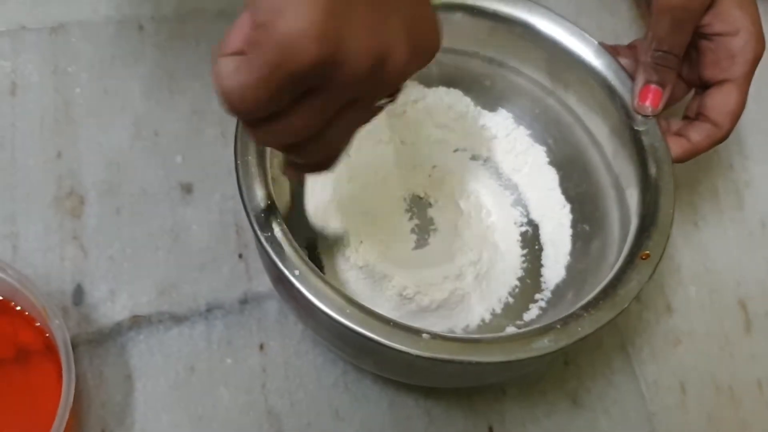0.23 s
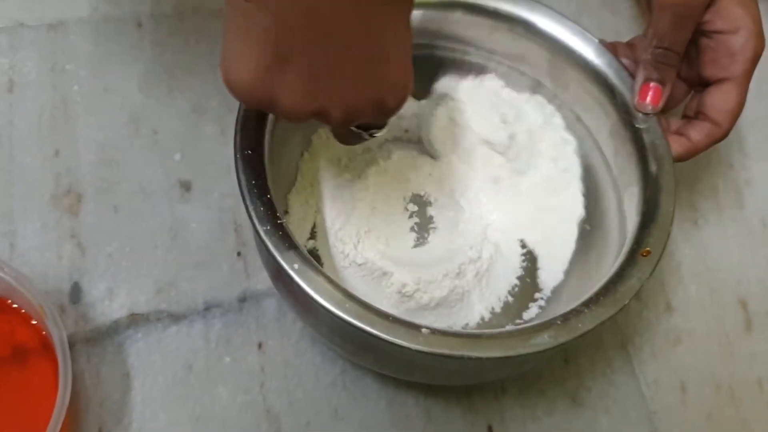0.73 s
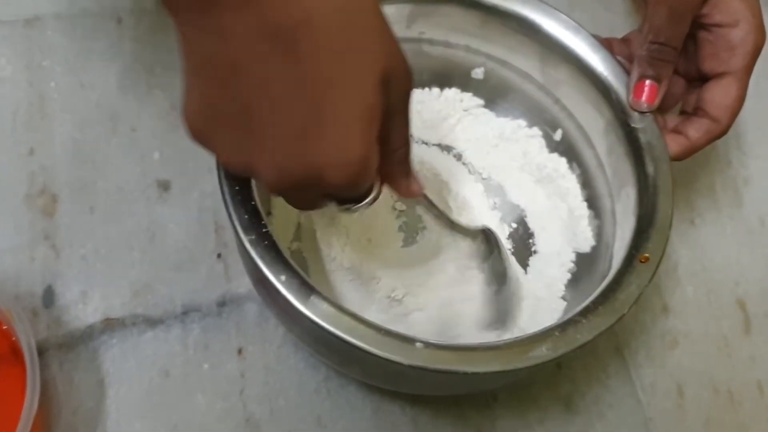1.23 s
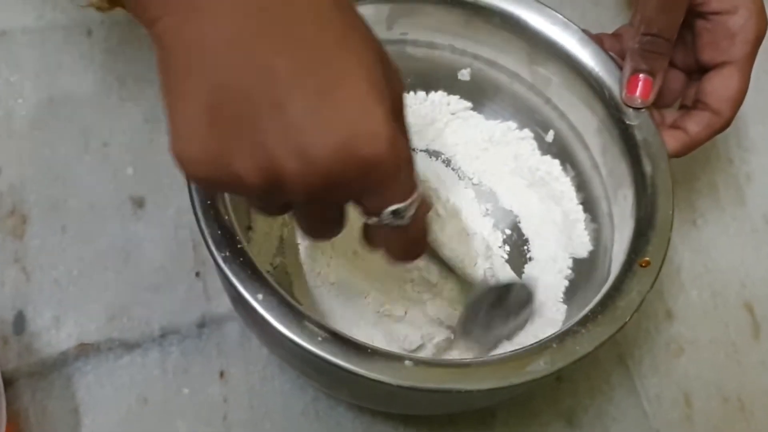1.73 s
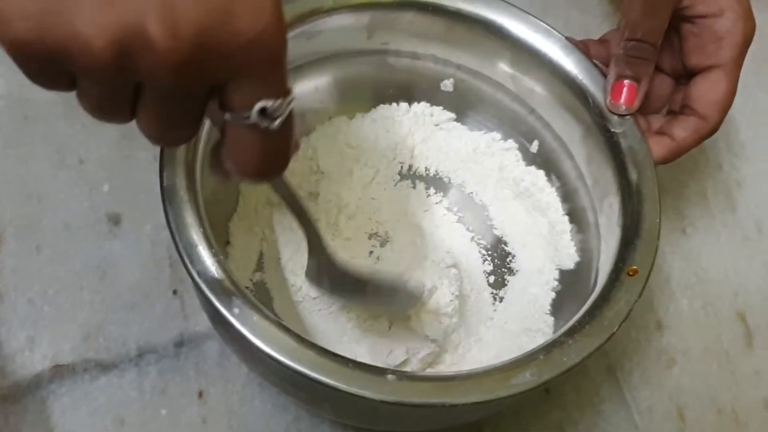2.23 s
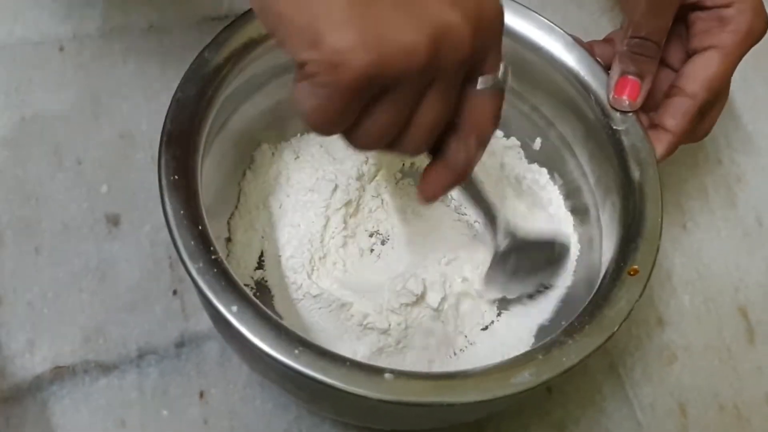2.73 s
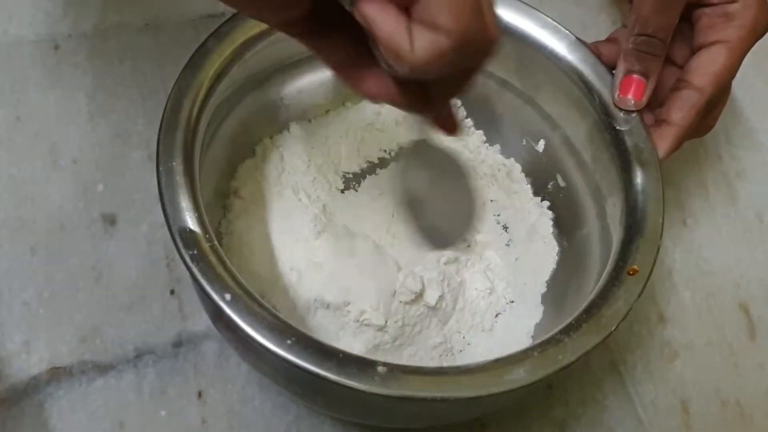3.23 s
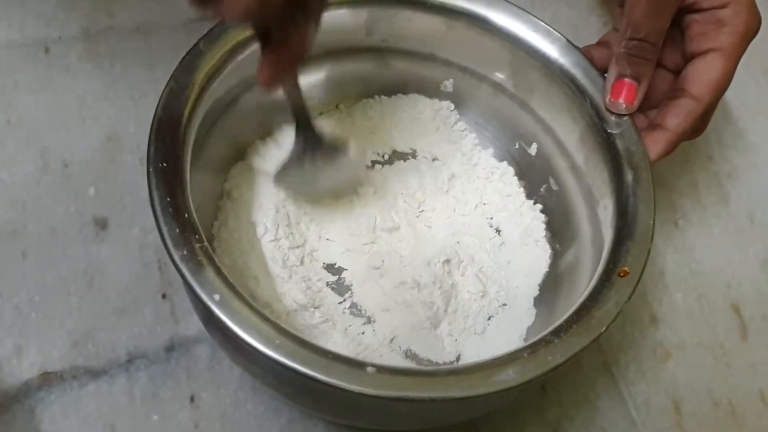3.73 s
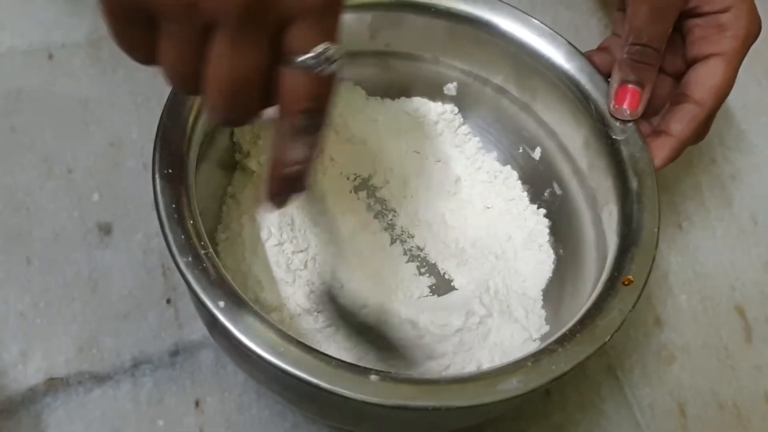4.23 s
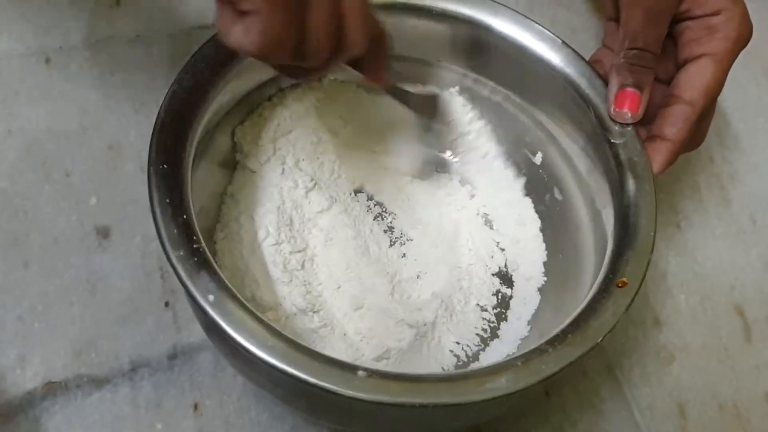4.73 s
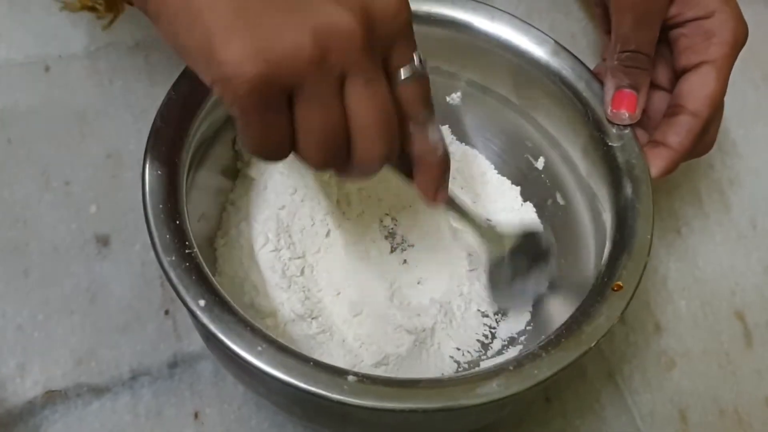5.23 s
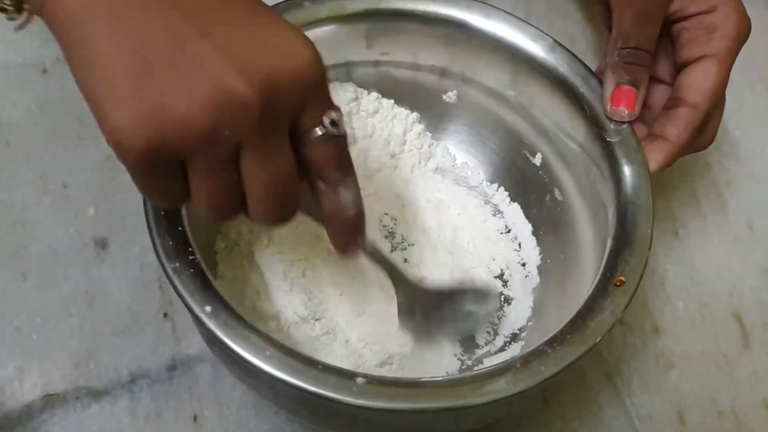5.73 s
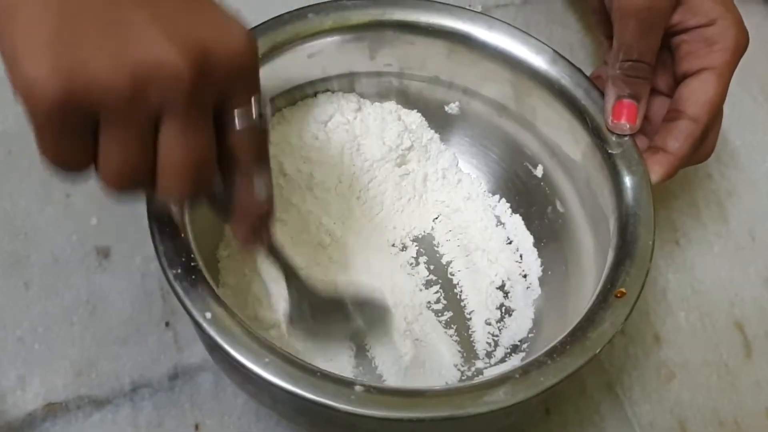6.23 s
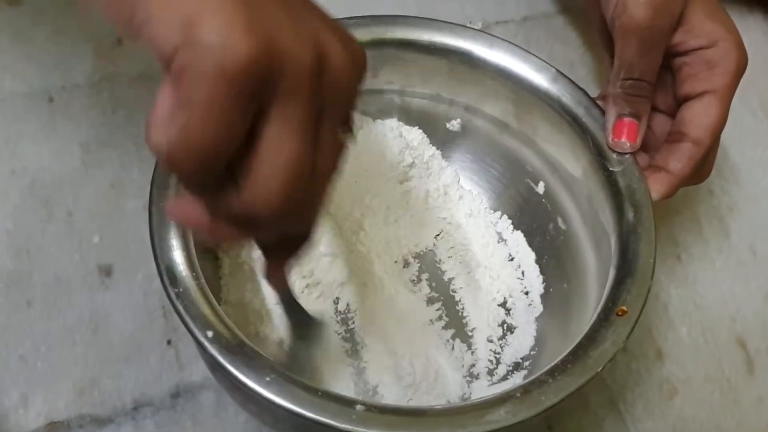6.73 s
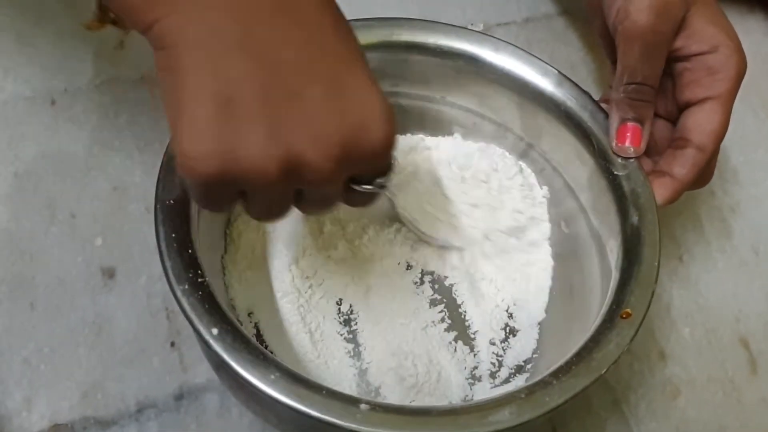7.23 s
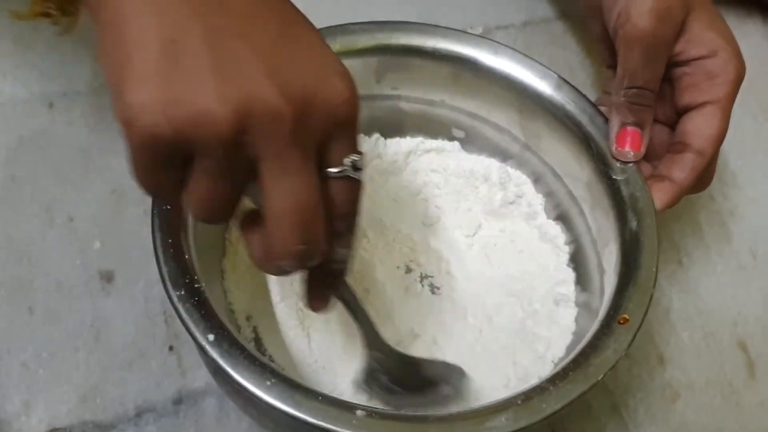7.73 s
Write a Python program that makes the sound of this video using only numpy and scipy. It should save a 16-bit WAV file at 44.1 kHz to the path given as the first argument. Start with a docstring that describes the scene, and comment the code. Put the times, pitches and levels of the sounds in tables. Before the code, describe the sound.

Close stereo pickup of a spoon dragging through powder against a thin metal bowl. Scrapes start at once, thin out with gaps, then grow busier and harder, with several solid clacks and crunchy scratches before a last longer scrape. The bowl shifts faintly on stone. Short hard-room echoes surround it, over constant airy hiss, soft rumble and hum; the right side is duller on top.

```python
"""In a small hard room, a steel spoon stirs dry flour in a hand-held steel bowl on a stone top.
Each stroke grinds powder along the wall: showers of tiny clicks set off the resonances of the bowl.
The spoon lands with damped knocks, catches on grit in bursts of noise, and now and then rings the steel.
The bowl shifts on the stone with short dull rumbles. Behind it all runs a high, hollow hiss of filtered
noise, perhaps a gas burner, over a low rumble and a mains hum."""
import sys
import numpy as np
from scipy import signal
from scipy.fft import rfft, irfft
from scipy.io import wavfile

SR = 44100
rng = np.random.default_rng(int(sys.argv[2]) if len(sys.argv) > 2 else 0)


def to_wav(sig):
    """Store sig (one row per channel, or 1-D mono) as 16-bit WAV at the path in sys.argv[1].

    Samples outside -1..1 are clipped; the rate is SR.
    """
    pcm = np.clip(np.atleast_2d(sig), -1, 1) * 32767
    pcm = np.round(pcm).astype(np.int16)
    wavfile.write(sys.argv[1], SR, pcm.T)  # frames by channels


N = 352359

# middle resonances under the sliding spoon: (pitch_hz, width_hz, relative level_db)
MIDDLE_RESONANCES = [(2235, 300, -4), (2540, 820, -2.5), (3020, 170, -13), (3500, 780, 0.5),
                     (4150, 240, 2.5), (4400, 254, -1)]
# high resonances under the sliding spoon: (pitch_hz, width_hz, relative level_db)
HIGH_RESONANCES = [(5460, 670, -11.5), (7056, 464, 3), (8100, 1170, -3), (9260, 660, -2), (10750, 990, 3),
                   (12370, 1840, 0.5), (14800, 800, 0.5), (15600, 260, -5)]
# tones of the steel ringing freely: (pitch_hz, relative level_db, time to fall by 60 dB t60_s)
FREE_RING = [(633, -1.5, 0.36), (1120, -5.5, 0.43), (1500, -2, 0.18), (3147, -10, 0.7), (3530, -3.5, 0.23),
             (3880, -4, 0.22), (4354, 1.5, 0.31), (4450, -13, 0.11), (5600, -8.5, 0.25), (5970, -13, 0.11),
             (6260, -6.5, 0.14), (6780, -4, 0.25), (7850, 0.5, 0.1), (9345, -25, .3), (10860, 0, 0.29),
             (12470, -22, .21), (12690, -15, .25), (14630, -18.5, .25)]


def from_db(db):
    """Turn decibels into a gain."""
    return 10 ** (np.asarray(db) / 20)


def rms_one(x):
    """Scale a sound to an average (rms) strength of 1."""
    return x / np.sqrt(np.mean(x ** 2) + 1e-20)


def seconds(size):
    """Time in seconds for each of so many samples."""
    return np.arange(size) / SR


def dying(t, t60):
    """Gain that falls by 60 dB in t60 seconds."""
    return np.exp(-np.log(1000) * t / t60)


def add(out, s, sound):
    """Mix a sound in, starting at time s."""
    at = max(round(s * SR), 0)
    out[..., at:at + sound.shape[-1]] += sound[..., :N - at]


def drift(rate):
    """Slow random wander with spread 1, moving to a new chance value `rate` times a second."""
    knots = rng.standard_normal(N // 16)
    return rms_one(np.interp(seconds(N) * rate, np.arange(len(knots)), knots))


def stereo(pair, alike):
    """Blend two unrelated signals into a left and a right that are alike to a given degree."""
    alike = np.clip(alike, -1, 1)
    shared = np.sqrt((1 + alike) / 2) * pair[0]
    opposed = np.sqrt((1 - alike) / 2) * pair[1] * [[1], [-1]]
    return shared + opposed


def colour(x, spectrum, size=8192):
    """Filter that follows a (pitch_hz, level_db) table and responds as early as it can (minimum phase)."""
    hz, db = np.transpose(spectrum)
    gain = from_db(np.interp(np.log(np.fft.rfftfreq(size, 1 / SR) + 1), np.log(hz), db))
    # folding the cepstrum (the spectrum of the log gain) puts the whole response after time 0
    cepstrum = irfft(np.log(gain))
    cepstrum[1:size // 2] *= 2
    cepstrum[size // 2 + 1:] = 0
    response = irfft(np.exp(rfft(cepstrum)))
    return signal.oaconvolve(x, response[None], axes=1)[:, :N]


def resonate(x, resonances):
    """Resonances side by side, of alternating sign; a wider one dies away sooner."""
    out = 0
    for k, (hz, width, db) in enumerate(resonances):
        r = np.exp(-np.pi * width / SR)
        poles = [1, -2 * r * np.cos(2 * np.pi * hz / SR), r * r]
        ringing = signal.lfilter([1, 0, -1], poles, x + 1e-18)
        out = out + (-1) ** k * from_db(db) * (1 - r * r) / 2 * ringing
    return out


def band(x, low_hz, high_hz):
    """Keep what lies between two pitches, with gentle edges."""
    edges_hz = [low_hz, min(high_hz, .45 * SR)]
    return signal.sosfilt(signal.butter(2, edges_hz, "band", fs=SR, output="sos"), x)


def sweep(t, length, crest, swell_db):
    """Drag, rasp and hiss gains of one sweep: the push grows to a crest and eases off, then the spoon lifts."""
    touch_s, lift_t60_s = .012, .12   # the spoon sets down, and leaves the wall
    # over a sweep the spoon's weight comes off the wall, and the powder hiss thins a little
    settle_db, thin_db = 4, -1.5
    drag_follows, rasp_follows = 0.58, 0.97   # share of the swell that drag and rasp take part in
    along, crest = np.clip(t / length, 0, 1), np.clip(crest, .02, .98)
    push_db = -swell_db * np.maximum(1 - along / crest, (along - crest) / (1 - crest))
    touching = np.clip(t / touch_s, 0, 1) * dying(np.maximum(t - length, 0), lift_t60_s)
    drag_db = drag_follows * push_db - settle_db * (along - crest)
    rasp_db = rasp_follows * push_db
    hiss_db = push_db + thin_db * (along - crest)
    return touching * from_db([drag_db, rasp_db, hiss_db])


def stroke_gains():
    """Drag, rasp and hiss gains of all sweeps, with bell-shaped bites on top."""
    # sweeps of the spoon through the flour: (start_s, length_s, place of the hardest push 0-1,
    # swell up to that push_db, then before trims: drag on the wall_db, squeaky rasp_db, powder hiss_db)
    strokes = [(0.0, 0.22, 0.03, 19.5, -46.5, -50, -42), (0.208, 0.45, 0.03, 10, -51, -51.5, -47.5),
               (0.698, 0.24, 0.84, 4, -61, -62, -60), (0.956, 0.13, 0.16, 9.5, -56, -55, -49),
               (1.685, 0.32, 0.53, 9.5, -54.5, -50, -49), (2.457, 0.22, 0.7, 3.5, -57, -49.5, -46),
               (2.718, 0.39, 0.1, 3, -57, -55.5, -48), (3.494, 0.19, 0.7, 8, -51, -47, -43),
               (3.914, 0.059, 0.73, 8.5, -45.5, -46, -39), (4.006, 0.1, 0.3, 7, -47, -44.5, -41.5),
               (4.319, .09, .6, 3, -58, -57, -71), (4.416, 0.36, 0.29, 18, -52, -46.5, -37.5),
               (5.152, 0.32, 0.46, 11.5, -52.5, -54.5, -44), (5.735, 0.22, 0.29, 18, -41, -43, -41),
               (6.17, 0.15, 0.85, 11, -53, -44.5, -41.5), (6.633, .34, 0, 8, -46, -48, -41.5),
               (6.999, .16, 0.58, 7.5, -51, -44.5, -43.5), (7.215, .16, 0.13, 4.5, -57, -53, -51),
               (7.47, 0.071, 0.3, 4, -59, -72, -60.5), (7.68, 0.4, 0.65, 8.5, -52, -52, -47)]
    # the edge bites through the flour to the steel, in a short bright scratch:
    # (middle_s, length at half height_s, then before trims: rasp_db, hiss_db)
    bites = [(0.229, 0.029, -42, -37.5), (0.271, 0.022, -53, -38.5), (0.398, 0.027, -41.5, -52),
             (1.797, 0.048, -56, -43), (2.925, 0.043, -54, -42.5), (3.092, 0.035, -53, -44.5),
             (4.064, 0.041, -52, -33.5), (4.452, 0.047, -46, -46), (4.568, 0.047, -66, -48),
             (5.349, 0.045, -37, -41), (5.84, 0.058, -53, -28.5), (6.658, 0.015, -54, -33.5),
             (6.691, 0.027, -51, -39.5), (6.9, 0.08, -70, -47), (7.006, 0.031, -58, -40),
             (7.806, 0.055, -58, -37.5)]
    bite_drag_db = -4.5   # drag of a bite against its rasp
    t, gains = seconds(SR), np.zeros((3, N))
    for s, length, crest, swell_db, *levels_db in strokes:
        add(gains, s, from_db(levels_db)[:, None] * sweep(t, length, crest, swell_db))
    for s, length, rasp_db, hiss_db in bites:
        bell = np.hanning(max(round(2 * length * SR), 1))
        levels_db = [rasp_db + bite_drag_db, rasp_db, hiss_db]
        add(gains, s - length, from_db(levels_db)[:, None] * bell)
    return gains


def grains(per_s, spread_db):
    """Two streams of tiny clicks of uneven size: powder crushed under the spoon."""
    sizes = from_db(spread_db * np.minimum(rng.exponential(1, (2, N)), 4))
    signed = sizes * rng.choice([-1, 1], (2, N))
    return signed * (rng.random(N) < per_s / SR)


def travelling(x, moves_per_s, path_t60=0.0074, ring_db=-2.5, ring_t60=0.049, focus_db=12, count=10, order=70):
    """The spoon slides between spots, each with its own nulls and mix of the bowl's many high modes."""
    t, out, power = seconds(4096), 0, 0
    mode_hz = np.linspace(2000, 16000, order) + rng.normal(0, 50, order)
    modes = np.exp(2j * np.pi * mode_hz[:, None] * t) * dying(t, ring_t60)
    for spot in range(count):
        paths = rms_one(stereo(rng.standard_normal((2, len(t))), alike=0.37) * dying(t, path_t60))
        strengths = rng.exponential(1, order) * np.exp(2j * np.pi * rng.random((2, order)))
        ring = rms_one((strengths @ modes).real)
        near = from_db(focus_db * drift(moves_per_s))
        heard = signal.oaconvolve(x, paths + from_db(ring_db) * ring, axes=1)[:, :N]
        out = out + near * heard / heard.std(axis=1, keepdims=True)
        power = power + near ** 2
    return out / np.sqrt(power)   # the total stays level as the spots trade places


def singing(force):
    """Rubbing keeps the free modes of the steel faintly alive."""
    # a longer ring means a narrower resonance
    resonances = [(hz, np.log(1000) / (np.pi * t60), db) for hz, db, t60 in FREE_RING]
    return resonate(force, resonances)


def scraping(drag_db=-1, rasp_db=-1, mid_db=0, hiss_db=3, sing_db=7, grit_db=-7,
             judder_db=3.0, judder_per_s=70, lumpy_db=2, rasp_share=0.5):
    """Grains excite the bowl while the spoon sticks and slips; the middle follows both rasp and hiss."""
    # low resonances under the sliding spoon: (pitch_hz, width_hz, relative level_db)
    low_resonances = [(370, 69, -22), (600, 23, -3), (783, 180, 10), (970, 260, -8)]
    # squeaky resonances of the rasp: (pitch_hz, width_hz, relative level_db)
    rasp_resonances = [(1550, 163, 5), (1800, 240, -22)]
    drag, rasp, hiss = stroke_gains()
    between = (rasp + 1e-9) ** rasp_share * (hiss + 1e-9) ** (1 - rasp_share)
    judder = rms_one(from_db(judder_db * drift(judder_per_s)))

    powder = travelling(stereo(grains(per_s=5000, spread_db=3), alike=0.94), moves_per_s=13)
    grit = rms_one(stereo(grains(per_s=500, spread_db=3.5), alike=0.14))
    lumps = stereo(grains(per_s=1300, spread_db=2.0), alike=0.66) * from_db(lumpy_db * drift(30))
    squeak_grains = stereo(grains(per_s=2500, spread_db=2.0), alike=0.18)

    low = band(resonate(lumps, low_resonances), 310, 1110)
    squeak = band(resonate(squeak_grains, rasp_resonances), 1310, 2080)
    mid = band(resonate(powder, MIDDLE_RESONANCES), 1620, 5600)
    high = band(resonate(powder + from_db(grit_db) * grit, HIGH_RESONANCES), 4400, 17700)

    # pressure drives the bowl's low resonances, loose powder its high ones
    rub = from_db(drag_db) * drag * rms_one(low)
    rub += from_db(rasp_db) * rasp * rms_one(squeak)
    rub += from_db(mid_db) * between * rms_one(mid)
    rub += from_db(hiss_db) * hiss * rms_one(high)
    return judder * rub + from_db(sing_db) * singing(between * powder)


def clinks(shimmer=0.95, beat_hz=14, rise_s=0.0012):
    """The struck steel rings freely; each mode has a slightly weaker close twin that makes it beat."""
    # spoon strikes bare steel: (start_s, relative level_db, strongest ring_hz, fall-off_db per octave)
    strikes = [(0.0, -45, 1500, -1), (0.214, -34.5, 7000, 4.5), (2.448, -32.5, 4100, 7.5),
               (3.863, -47, 633, 18), (6.157, -47, 7100, 16), (6.672, -36, 3020, 29)]
    out, t = np.zeros((2, N)), seconds(SR)
    for s, db, centre_hz, fall_db in strikes:
        for hz, mode_db, t60 in FREE_RING:
            phase = rng.uniform(0, 2 * np.pi) + rng.normal(0, 0.68, (2, 1))
            twin_hz = hz + rng.normal(0, beat_hz)
            tone = np.sin(2 * np.pi * hz * t + phase) + shimmer * np.sin(2 * np.pi * twin_hz * t)
            gain = from_db(db + mode_db - fall_db * abs(np.log2(hz / centre_hz)))
            add(out, s, gain * tone * dying(t, t60) * (1 - np.exp(-t / rise_s)))
    return out


def background():
    """Noise shaped into a hollow hiss with three resonances, a low rumble, and a sine for mains hum."""
    # slow course of the background: (time_s, then before trims: rumble_db, hiss_db)
    course = [(0.0, -69, -53), (0.78, -68, -53.5), (2.58, -68, -51), (2.91, -64, -51), (5.41, -68, -52.5),
              (5.9, -63.5, -51.5), (7.99, -69, -51.5)]
    # shape of the steady hiss: (pitch_hz, relative level per hertz_db)
    hiss_shape = [(1100, -30.5), (1300, -20.5), (1520, 2), (1800, -8.5), (2200, -13.5), (2640, 0.5),
                  (3050, -11), (3650, -0.5), (4150, -8), (4700, -24), (5400, -29), (7500, -23.5),
                  (10000, -36), (16000, -35.5)]
    # shape of the low rumble: (pitch_hz, relative level per hertz_db)
    rumble_shape = [(20, -39), (35, -15), (50, -3), (70, -7), (100, -6.5), (160, -13.5), (250, -30),
                    (450, -23), (800, -33), (1300, -49), (3000, -69)]
    rumble_trim_db, hiss_trim_db = 6.5, 4.5
    hum_db, hum_hz = -61.5, 50.3
    dip_s, dip_spread_s, dip_db = 7.5, 0.27, -11.5   # the spread is to each side of the middle
    s, *levels = np.transpose(course)
    rumble_db, hiss_db = [np.interp(seconds(N), s, db) for db in levels]
    hiss = rms_one(colour(stereo(rng.standard_normal((2, N)), alike=0.015), hiss_shape))
    # the lowest resonance of the hiss sinks for a moment
    dip = np.exp(-((seconds(N) - dip_s) / dip_spread_s) ** 2)
    hiss = hiss + (from_db(dip_db * dip) - 1) * resonate(hiss, [(1480, 430, 0)])
    rumble = rms_one(colour(stereo(rng.standard_normal((2, N)), alike=0.71), rumble_shape))
    hum = np.sqrt(2) * np.sin(2 * np.pi * hum_hz * seconds(N))
    noise = from_db(hiss_db + hiss_trim_db) * hiss + from_db(rumble_db + rumble_trim_db) * rumble
    return noise + from_db(hum_db) * hum


def knocks(rattle_db=-22, rattle_t60=0.034, click_t60=0.045, phase_spread=0.66,
           favour_db=7, favour_octaves=0.31, travel_s=0.001):
    """The spoon hits the wall and chatters briefly; a cushioned contact loses its treble."""
    # spoon lands on the flour-cushioned wall: (start_s, relative level_db, contact sharpness_hz,
    # modes favoured by the spot_hz, click against that level_db)
    landings = [(0.081, -36, 1490, 914, -1), (0.213, -37, 3500, 1475, -1), (0.805, -49, 8000, 7100, 12.5),
                (1.690, -46, 893, 836, -20), (1.777, -38, 1100, 950, -8), (2.448, -31, 4000, 1620, 2.5),
                (3.057, -40.5, 900, 850, -20), (3.485, -20.5, 6000, 4450, -11),
                (3.4902, -25.5, 2970, 1900, -18), (3.862, -25.5, 1190, 480, -13.5),
                (4.043, -32, 900, 850, -20), (4.508, -35, 1500, 900, -12), (5.016, -43.5, 7000, 7000, -16),
                (5.136, -25.5, 2220, 875, -14.5), (5.185, -42, 1200, 850, -16),
                (5.724, -12, 2780, 1770, -17), (5.741, -36, 3000, 1800, -18), (5.791, -21, 600, 710, -20.5),
                (6.251, -25, 2200, 1300, -5), (6.6183, -12, 1700, 1000, -15.5),
                (7.097, -37.5, 900, 850, -20), (7.518, -45, 900, 820, -20)]
    # bowl wall, damped by flour and hand: (pitch_hz, relative level_db, time to fall by 60 dB t60_s)
    wall_modes = [(333, -27, 0.061), (480, -28, 0.014), (757, -2.5, 0.021), (950, -3.5, 0.016),
                  (1262, -8, 0.019), (1571, -1, 0.019), (1900, -6, 0.01), (2350, -6.5, 0.018),
                  (2710, -9, 0.011), (3270, 2.5, 0.006), (4440, -3, 0.01), (7020, -9, 0.018)]
    out, t = np.zeros((2, N)), seconds(4096)
    for s, db, sharp_hz, spot_hz, click_db in landings:
        wall = 0
        for k, (hz, mode_db, t60) in enumerate(wall_modes):
            favour = favour_db * np.exp(-(np.log2(hz / spot_hz) / favour_octaves) ** 2)
            # higher modes reach the two microphones ever more out of step
            phase = rng.normal(0, phase_spread, (2, 1)) * hz / 2000
            tone = np.sin(2 * np.pi * hz * t + phase) * dying(t, t60)
            wall = wall + (-1) ** k * from_db(mode_db + favour) * tone
        wall = wall * np.minimum(t / travel_s, 1) ** .5   # the blow takes a moment to spread round the wall
        chatter = band(rng.standard_normal(len(t)), 1920, 12000) * dying(t, rattle_t60)
        force = (t == 0) + from_db(rattle_db) * chatter   # one sharp blow, then the chatter
        struck = signal.fftconvolve(wall, force[None])[:, :len(t)]
        soft = signal.butter(1, min(sharp_hz, .4 * SR), fs=SR)
        thump = signal.lfilter(*soft, struck)
        click = band(rng.standard_normal((2, len(t))), 720, 10200) * dying(t, click_t60)
        add(out, s, from_db(db) * (band(thump, 420, 12000) + from_db(click_db) * click))
    return out


def catches(level_db=-3, body_db=-3):
    """A catch lets go in a short burst of slips: fading noise through the bowl's resonances."""
    # the spoon's edge catches on grit: (start_s, level before trim_db)
    snags = [(0.2175, -12), (0.278, -27), (0.8051, -45), (1.7765, -25), (1.791, -24), (1.81, -21),
             (2.7678, -28), (2.9093, -32), (4.0142, -17.5), (4.051, -17), (4.4616, -26.5), (4.4949, -18),
             (4.5065, -20), (4.5558, -28), (5.018, -32), (6.061, -35), (6.1571, -19), (6.8476, -28),
             (7.005, -31), (7.2232, -27.5)]
    catch_t60_s = 0.024
    slips, t = np.zeros((2, N)), seconds(4096)
    for s, db in snags:
        burst = rng.standard_normal((2, len(t))) * dying(t, catch_t60_s)
        add(slips, s, from_db(db + level_db) * burst)
    return resonate(slips, HIGH_RESONANCES) + from_db(body_db) * resonate(slips, MIDDLE_RESONANCES)


def thuds():
    """Short dull rumbles of low noise that swell and fade as the bowl shifts."""
    # the bowl shifts on the stone: (middle_s, level_db, length_s, rough centre pitch_hz)
    shifts = [(1.435, -47.5, 0.025, 125), (3.868, -49, 0.013, 560), (4.35, -49, .035, 200),
              (4.45, -57, 0.07, 190)]
    out, t = np.zeros((2, N)), seconds(N)
    for s, db, length, hz in shifts:
        rumble = rms_one(band(rng.standard_normal(N), hz / 1.9, hz * 1.38))
        out += from_db(db) * rumble / np.cosh(np.clip(2 * (t - s) / length, -20, 20))
    return out


def room(x, first_s=0.0044, early_db=-14, early_t60=0.37):
    """Dense echoes from the hard surfaces: a shorter and a longer noise tail, starting together."""
    tail_db, tail_t60_s = -8, 0.53
    t = seconds(SR)
    echo = 0
    for db, t60 in (early_db, early_t60), (tail_db, tail_t60_s):
        tail = rng.standard_normal((2, len(t))) * dying(t, t60) * (t > first_s)
        echo = echo + from_db(db) * rms_one(tail) / np.sqrt(len(t))
    return signal.oaconvolve(x, band(echo, 260, 10300), axes=1)[:, :N]


def scene():
    """The spoon in the bowl, its room, and the background."""
    bowl = scraping() + catches() + knocks() + clinks() + thuds()
    return bowl + room(bowl) + background()


def record(dry):
    """The right microphone is shaded and notched; the top is cut in both."""
    # right microphone's tone filter: (pitch_hz, level_db)
    right_tone = [(50, -6.5), (350, -0.5), (800, -2), (1500, -4.5), (2500, -2), (4000, -3), (6100, 3),
                  (7300, -9), (8150, -13), (9400, -10), (10700, -5.5), (12800, -1), (14300, -9.5),
                  (15600, -5)]
    cutoff_hz = 15900
    ports = np.vstack([dry[:1], colour(dry[1:], right_tone)])
    return signal.sosfilt(signal.ellip(10, .2, 80, cutoff_hz, fs=SR, output="sos"), ports)


dry = scene()
out = record(dry)
to_wav(out)
```